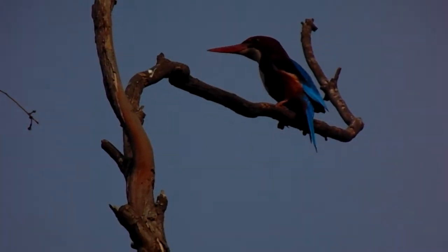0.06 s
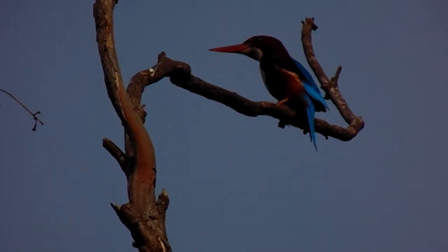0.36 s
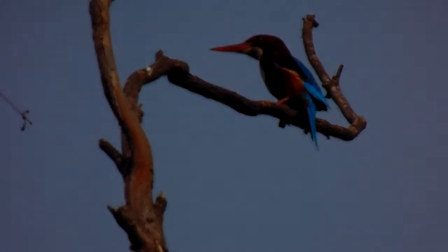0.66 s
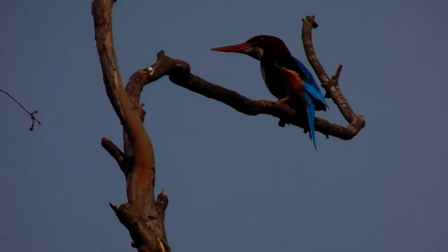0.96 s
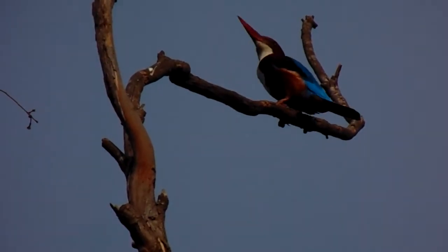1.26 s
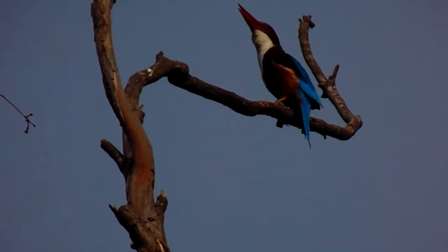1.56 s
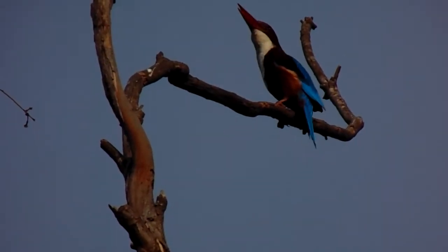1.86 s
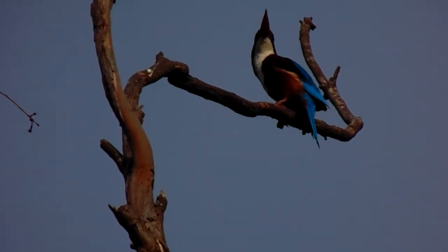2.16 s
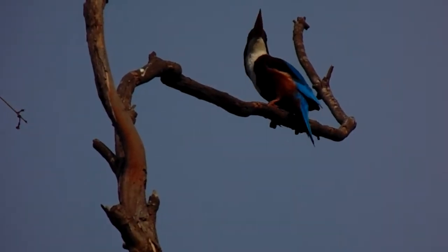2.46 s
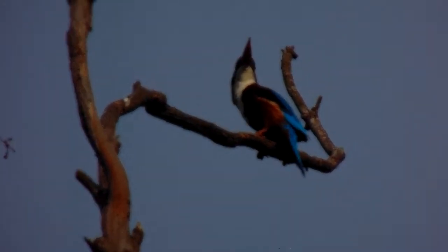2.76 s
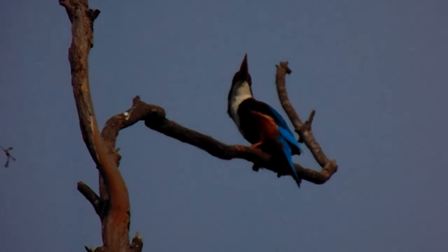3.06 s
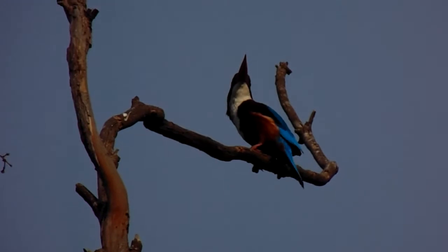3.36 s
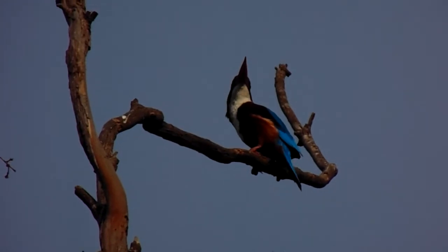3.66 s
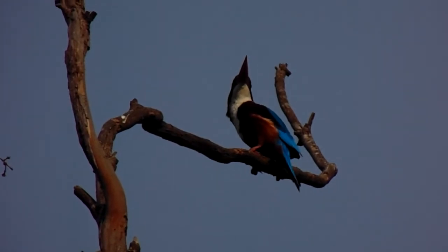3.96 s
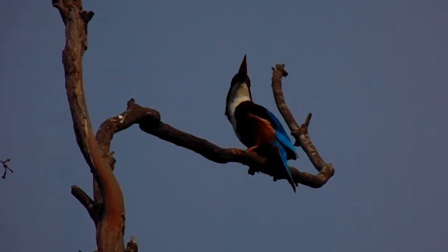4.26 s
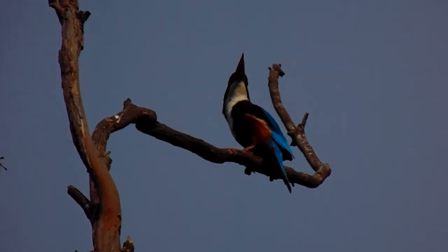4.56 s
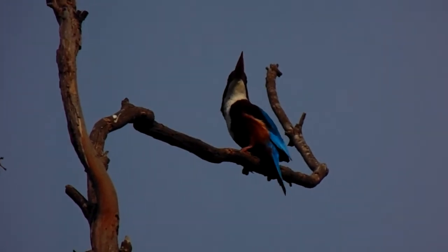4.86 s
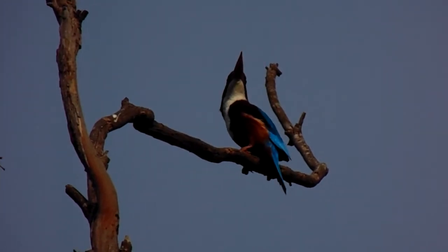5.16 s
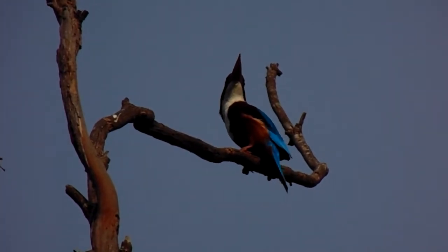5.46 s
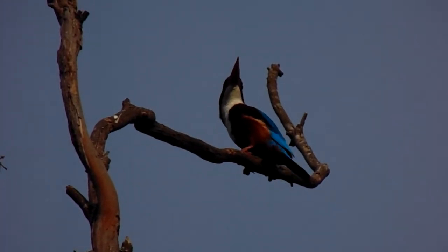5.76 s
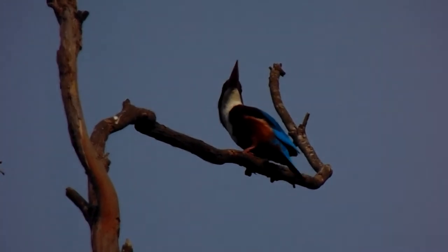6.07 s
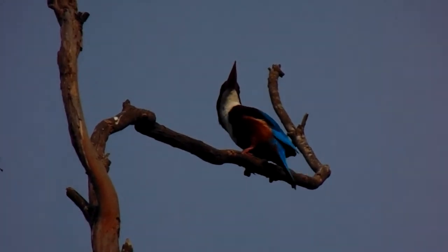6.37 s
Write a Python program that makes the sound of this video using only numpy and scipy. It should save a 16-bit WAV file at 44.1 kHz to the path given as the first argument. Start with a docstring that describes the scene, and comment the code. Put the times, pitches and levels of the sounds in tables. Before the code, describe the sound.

Faint chirps and a steady microphone hiss open an outdoor scene with a low hum of distant traffic. A kingfisher then trills high whistled double notes, three or four a second, each with a raspy edge and a short echo from the trees. Another bird overlaps it with hoarse, downward-sliding squeals, first around the start of the trill and again near the end, as a far vehicle swells slightly.

```python
"""A kingfisher on a bare branch trills a long series of double notes: in each half its syrinx flaps
in a rasp, then locks into a short arched whistle. A second bird cuts in with falling squeals,
harmonics sliding through the resonances of its beak, and small birds chirp far off.
Trees scatter every call back as reverberation. Behind them lie outdoor air, distant traffic
and the hiss of the camera."""
import sys
import numpy as np
from scipy import signal
from scipy.fft import rfft, irfft, next_fast_len
from scipy.io import wavfile
from scipy.ndimage import map_coordinates

SR = 44100
rng = np.random.default_rng(int(sys.argv[2]) if len(sys.argv) > 2 else 0)


def unload_wav(signal):
    """Save mono or channel-first audio to the path in sys.argv[1] as 16-bit WAV at rate SR, clipped to [-1, 1]."""
    wavfile.write(
        sys.argv[1],
        SR,
        np.round(np.clip(np.atleast_2d(signal).T, -1, 1) * 32767).astype(np.int16),
    )


N = 287973
TOP_HZ = 14250


def amp(db):
    """Decibels to amplitude ratio."""
    return 10 ** (np.asarray(db) / 20)


def unit(x):
    """Normalisation to rms 1."""
    return x / np.sqrt(np.mean(x ** 2) + 1e-20)


def along(points, hz):
    """Interpolation of (frequency_hz, value) points on a log frequency axis."""
    f, v = np.transpose(points)
    return np.interp(np.log(hz + 1), np.log(f + 1), v)


def curves(rows, t):
    """Linear interpolation of each column after the first, at times t."""
    s, *cols = np.transpose(rows)
    return [np.interp(t, s, c) for c in cols]


def wobble(rate, n):
    """Smooth random modulation: a spline through rate knots a second."""
    return map_coordinates(rng.standard_normal(int(n * rate / SR) + 4), [np.arange(n) * rate / SR])


def cycle(hz):
    """Phase as the integral of frequency."""
    return 2 * np.pi * np.cumsum(hz) / SR


def bend(u, start_hz, middle_hz, end_hz):
    """Parabolic glide through three pitches as u goes from 0 to 1."""
    return np.polyval(np.polyfit([0, .5, 1], [start_hz, middle_hz, end_hz], 2), u)


def swell(t, peak_s, db, rise_s, fall_s):
    """Gaussian envelope with separate rise and fall widths."""
    return amp(db) * np.exp(-((t - peak_s) / np.where(t < peak_s, rise_s, fall_s)) ** 2)


def coloured(x, spectrum):
    """Spectral shaping by (frequency_hz, gain_db) points, at rms 1."""
    m = next_fast_len(2 * len(x))
    gain = amp(along(spectrum, np.fft.rfftfreq(m, 1 / SR)))
    return unit(irfft(rfft(x, m) * gain, m)[:len(x)])


def add(track, start_s, x):
    """Superposition of x on the track."""
    i = max(round(start_s * SR), 0)
    part = track[i:i + len(x)]
    part += x[:len(part)]


# spectrum of outdoor air: frequency_hz, gain_db
AIR_SPECTRUM = [(12, -42), (20, -3), (46, -1), (69, -4.5), (101, -9), (126, -8), (207, -7.5), (319, -11.5),
                (552, -10.5), (652, -12), (752, -10.5), (2480, -11.5), (2860, -10.5), (3150, -10.5),
                (6000, -15.5), (7800, -59), (13200, -120)]
def outdoor_air():
    """Ambient noise: a broad spectrum whose level drifts slightly."""
    drift_db = .5 * wobble(3.63, N)
    return amp(-42 + drift_db) * coloured(rng.standard_normal(N), AIR_SPECTRUM)


# spectrum of the hiss: frequency_hz, gain_db
HISS_SPECTRUM = [(4000, -23.5), (6300, -10), (6900, -3.5), (7800, -1.5), (8300, 1.5), (8700, -7.5),
                 (10500, -7.5), (12000, -9.5), (14200, -7.5)]
def camera_hiss():
    """Self-noise: stationary and strongest in the treble."""
    return amp(-39.5) * coloured(rng.standard_normal(N), HISS_SPECTRUM)


# course of the road noise: time_s, level_db
ROAD_LEVEL = [(0, -52), (2, -50.5), (3.5, -50), (4.8, -44), (5.7, -43), (6.53, -50)]
# spectra of road noise and rumble: frequency_hz, gain_db
ROAD_SPECTRUM = [(70, -40), (120, -17), (170, 0.5), (300, -4), (430, -7.5), (700, -6), (1300, -8.5),
                 (2500, -29), (5000, -25.5)]
RUMBLE_SPECTRUM = [(90, -42), (135, -11), (158, -2), (185, -15), (300, -21), (600, -70), (2000, -120)]
# low swells on the road: peak_s, level_db, rise_s, fall_s
RUMBLE_SWELLS = [(2.8, -56, 0.37, .25), (4.8, -46, 0.099, 0.33)]
def road(t):
    """Amplitude-modulated noise: the road grows louder as a vehicle draws near."""
    level_db = curves(ROAD_LEVEL, t)[0] + .8 * wobble(5, N)
    roar = amp(level_db) * coloured(rng.standard_normal(N), ROAD_SPECTRUM)
    rumble_gain = sum(swell(t, *row) for row in RUMBLE_SWELLS)
    return roar + rumble_gain * coloured(rng.standard_normal(N), RUMBLE_SPECTRUM)


# a far vehicle's whine: time_s, pitch_hz, level_db
VEHICLE_WHINE = [(2.5, 389, -68), (3.2, 399.3, -54.5), (4.2, 418.2, -50), (5, 436, -54), (5.7, 432, -52.5),
                 (6.15, 409, -51), (6.53, 400, -57)]
# a far engine's swells: peak_s, pitch_hz, level_db, rise_s, fall_s
ENGINE_DRONES = [(.4, 97, -55, .7, .8), (1.89, 105, -45.5, .13, .17)]
# continuous hum: pitch_hz, level_db
HUM_TONES = [(45, -51.5), (69, -57), (205, -61.5)]
def engines(t, waver_db=2.5, waver=.015):
    """Propagation through air makes distant tones fluctuate in level and pitch."""
    whine_hz, whine_db = curves(VEHICLE_WHINE, t)
    tones = [(whine_hz, amp(whine_db))]
    tones += [(hz, swell(t, s, db, rise, fall)) for s, hz, db, rise, fall in ENGINE_DRONES]
    tones += [(hz, amp(db)) for hz, db in HUM_TONES]
    out = np.zeros(N)
    for hz, gain in tones:
        fading = amp(waver_db * wobble(12, N))
        out += gain * fading * np.sin(cycle(hz * (1 + waver * wobble(25, N))))
    return out


# reverberation time among the trees: frequency_hz, t60_s
TREE_DECAY = [(1000, .3), (2700, .28), (4000, .32), (6000, .27), (13000, .2)]
def among_trees(call, wet_db, build_s=0.013):
    """Scattering: a call's diffuse echo builds up as more distant trunks and leaves answer."""
    hz, t, noise = signal.stft(rng.standard_normal(SR // 2), SR, nperseg=256)
    decay = amp(-60 * t / along(TREE_DECAY, hz)[:, None])
    tail = signal.istft(noise * decay, SR, nperseg=256)[1]
    tail *= 1 - np.exp(-(np.arange(len(tail)) / SR / build_s) ** 2)
    return signal.fftconvolve(call, np.r_[1, amp(wet_db) * tail / np.linalg.norm(tail)])


# small birds' chirps: start_s, length_s, start_hz, middle_hz, end_hz, level_db
FAR_CHIRPS = [(0.07, 0.11, 10450, 10480, 10500, -44.5), (.17, 0.098, 7500, 7450, 7560, -40),
              (0.768, .096, 10800, 10800, 10650, -44), (.81, 0.048, 3010, 2580, 2400, -42),
              (1.863, 0.074, 3700, 3850, 3660, -42.5), (2.78, 0.069, 3400, 3250, 2930, -32),
              (3.025, .075, 3400, 3700, 3600, -41), (3.31, .08, 3750, 3630, 3280, -40),
              (3.578, 0.1, 3800, 3550, 3100, -37.5), (3.61, 0.15, 2500, 2360, 2410, -38.5),
              (3.838, 0.083, 3400, 3170, 2820, -39)]
def far_birds(waver=0.01):
    """Frequency-modulated pure tones: thin curved whistles from deeper in the trees."""
    out = np.zeros(N)
    for start_s, length_s, *pitches_hz, db in FAR_CHIRPS:
        u = np.linspace(0, 1, int(length_s * SR))
        hz = bend(u, *pitches_hz) * (1 + waver * wobble(377, len(u)))
        chirp = amp(db) * np.sin(np.pi * u) * np.sin(cycle(hz))
        add(out, start_s, among_trees(chirp, wet_db=-5.5))
    return out


# resonances of the second bird's throat and beak: frequency_hz, gain_db
BEAK_RESPONSE = [(1500, -34), (2100, -14.5), (2700, -7), (3500, 1.5), (4100, 0.5), (4400, -3), (4750, 1.5),
                 (5300, -6), (6100, -9), (7500, -14), (8400, -8.5), (9300, -2), (10000, -11.5),
                 (14000, -19)]
def squeal(hz, db, tilt_db_per_octave, jitter, shimmer_db=3.5):
    """Source and filter: the second bird's rough harmonics slide through stationary resonances."""
    phase = cycle(hz * (1 + jitter * wobble(1210, len(hz))))
    voice = np.zeros(len(hz))
    for k in range(1, 6):
        gain = amp(along(BEAK_RESPONSE, k * hz) + tilt_db_per_octave * np.log2(k))
        voice += (k * hz < SR / 2) * gain * np.sin(k * phase)
    voice *= amp(db + shimmer_db * wobble(251.5, len(hz)))
    return among_trees(voice, wet_db=-4, build_s=0.0029)


# the yelp that opens a squeal:
# accent_s, lead_s, fall_s, accent_hz, middle_hz, end_hz, level_db, fade_db, bright_db_per_octave
HIGH_YELPS = [(1.365, 0.015, 0.034, 2940, 2750, 2615, -18, -3.5, 0),
              (1.625, .02, 0.022, 3250, 2780, 2680, -27, 4, -4),
              (2.273, 0.019, 0.019, 3590, 3256, 3400, -18.5, -0.5, 5),
              (2.487, 0.0078, 0.021, 3220, 3094, 2900, -23.5, -1, 1),
              (5.165, 0.033, 0.014, 3750, 3480, 3200, -21, -11, 0),
              (5.443, 0.028, 0.0099, 3787, 3560, 3130, -20.5, -8, 0),
              (5.743, .037, 0.011, 3720, 3390, 3000, -22, -11, -3.5),
              (6.026, .027, 0.012, 3690, 3274, 2960, -21, -10, -3),
              (6.304, 0.02, 0.0089, 3745, 3406, 3100, -20.5, -0.5, 0)]
def yelps(tilt_db_per_octave=-6.5, flick_s=0.01206, lead_db=-8.5, jump_s=0.0045):
    """High register: a hoarse upward flick, a softer lead-in, then a clean accent that glides down."""
    out = np.zeros(N)
    for accent_s, lead_s, fall_s, *pitches_hz, db, fade_db, bright in HIGH_YELPS:
        t = np.arange(-lead_s, fall_s, 1 / SR)
        u = np.clip(t / fall_s, 0, 1)
        flick = np.interp(t + lead_s, [0, flick_s], [.86, 1])
        overshoot = np.interp(t, [-lead_s, 0], [1.07, 1])
        hz = flick * overshoot * bend(u, *pitches_hz)
        level_db = db + fade_db * u + np.interp(t, [-jump_s, 0], [lead_db, 0])
        jitter = .009 + .11 * np.exp(-((t + lead_s) / .009) ** 2)  # the hoarse onset soon settles
        add(out, accent_s - lead_s, squeal(hz, level_db, tilt_db_per_octave + bright, jitter))
    return out


# the wail a yelp breaks into:
# start_s, length_s, start_hz, settled_hz, plunge_octaves, level_db, bright_db_per_octave
LOW_WAILS = [(1.399, 0.063, 2040, 1975, 0.17, -23, -3.5), (1.648, 0.074, 2176, 1826, 0.11, -23, -6),
             (2.509, .058, 2150, 2150, 0.125, -28.5, 0.5), (5.181, 0.091, 2540, 2020, 0.45, -22, -1.5),
             (5.452, 0.089, 2610, 2047, 0.44, -23, -0.5), (5.755, .082, 2520, 2062, .46, -24, -1),
             (6.038, 0.097, 2536, 2093, .5, -24, -1), (6.311, 0.1, 2680, 2010, .48, -22.5, -0.5)]
def wails(tilt_db_per_octave=-3, sag_share=0.33, plunge_s=.034, swell_db=4):
    """Low register, led by the second harmonic: it sags, settles and plunges, rougher when forced."""
    out = np.zeros(N)
    for start_s, length_s, start_hz, settled_hz, octaves, db, bright in LOW_WAILS:
        t = np.arange(0, length_s, 1 / SR)
        u = t / length_s
        sag_hz = (start_hz - settled_hz) * np.exp(-(u / sag_share) ** 2)
        plunge = octaves * np.interp(length_s - t, [0, plunge_s], [1, 0]) ** 2
        hz = (settled_hz + sag_hz) * 2 ** -plunge
        # overtones come in with the attack and leave with the release
        attack_tilt = np.interp(t, [0, 0.017], [-6, 0])
        release_tilt = np.interp(length_s - t, [0, 0.02], [-11, 0])
        tilt = tilt_db_per_octave + bright + attack_tilt + release_tilt
        add(out, start_s, squeal(hz, db + swell_db * (u - .5), tilt, jitter=.026 * amp(bright)))
    return out


def screech(onset_s=2.299, centre_hz=4100, spread=0.2, attack_s=0.0074, hold_s=0.043, release_s=0.01):
    """Fast random frequency modulation spreads a tone into a band: one yelp's harsh ending."""
    out = np.zeros(N)
    t = np.arange(-attack_s, hold_s + release_s, 1 / SR)
    phase = cycle(centre_hz * np.exp(spread * wobble(1800, len(t))))
    voice = np.sin(phase) + amp(-15) * np.sin(2 * phase)
    gain = np.interp(t, [-attack_s, 0, hold_s, hold_s + release_s], [0, amp(-23), amp(-26), 0])
    add(out, onset_s - attack_s, among_trees(voice * gain, wet_db=-6.5))
    return out


# echoes from trunk, branches and ground: delay_s, gain_ratio
PERCH_ECHOES = [(.00324, .16), (.00358, .18), (.00461, .15), (.00771, .18), (.00816, .27)]
def around_perch(call):
    """Comb filtering: early reflections interfere with the direct sound, colouring all notes alike."""
    return call + sum(gain * np.pad(call, (round(delay_s * SR), 0))[:N] for delay_s, gain in PERCH_ECHOES)


# treble as the kingfisher's head turns: time_s, gain_db
HEAD_TURNS = [(1.7, 5.5), (2.5, 0), (3.25, 1.5), (3.8, -3), (4.9, -1), (6.5, -1.5)]
def bill_beam(call, t, treble_hz=4500):
    """Directivity: treble beams from the bill and fades as the head turns away."""
    treble = signal.sosfiltfilt(signal.butter(2, treble_hz, "high", fs=SR, output="sos"), call)
    return call + (amp(curves(HEAD_TURNS, t)[0]) - 1) * treble


# the rasp's envelope, timed from the whistle's middle: time_s, level_db
RASP_ENVELOPE = [(-.036, -21.5), (-.025, -6), (-.016, 1), (-.01, -4), (.002, -6), (.016, -5)]
# resonances of the kingfisher's throat: frequency_hz, gain_db
THROAT_RESPONSE = [(1200, -22.5), (1900, -17), (2350, -2), (2700, 1.5), (3050, -5.5), (3400, -11),
                   (5500, -21), (7000, -14.5), (8300, -20.5), (9400, -16), (10700, -26), (13500, -18.5)]
def rasp(t, flap_hz=270, scatter=.35):
    """Aperiodic vibration: the syrinx flaps in uneven pulses, filtered with its breath by the throat."""
    rate_hz = flap_hz * np.exp(scatter * wobble(300, len(t)))
    flap_count = np.floor(np.cumsum(rate_hz) / SR + rng.random())
    flaps = np.diff(flap_count, prepend=flap_count[0])
    sweep = np.sin(cycle(np.linspace(1000, TOP_HZ, SR // 200)))  # each flap is a 5 ms upward sweep
    pulses = unit(np.convolve(flaps, sweep)[:len(t)])
    breath = rng.standard_normal(len(t))
    return amp(curves(RASP_ENVELOPE, t)[0]) * coloured(pulses + breath, THROAT_RESPONSE)


# one whistle, timed from its middle: time_s, pitch_ratio, level_db
WHISTLE_ARCH = [(-.016, .7, -30), (-.0102, .84, -17), (-.0088, .9, -5), (-.007, .975, -1),
                (-.002, 1.018, -.3), (.004, .992, .7), (.0075, .93, .7), (.0105, .875, -7),
                (.015, .82, -26)]
# resonances of throat and open bill: frequency_hz, gain_db
BILL_RESPONSE = [(2900, -1.5), (4000, -46), (5200, -26.5), (5650, -19), (6200, -25.5), (7800, -31),
                 (8450, -14.5), (9000, -26), (10600, -30), (11250, -23.5), (12000, -35), (13700, -24)]
def whistle(t, hz, jitter=0.0053):
    """Periodic vibration: the syrinx locks into an arched tone whose harmonics the resonances pick out."""
    ratio, level_db = curves(WHISTLE_ARCH, t)
    pitch_hz = hz * ratio
    phase = cycle(pitch_hz * (1 + jitter * wobble(661, len(t))))
    harmonics = sum(amp(along(BILL_RESPONSE, k * pitch_hz)) * np.sin(k * phase) for k in range(1, 6))
    return amp(level_db) * harmonics


# the kingfisher's double notes: first_whistle_s, gap_s, pitch_hz, level_db
DOUBLE_NOTES = [(1.744, 0.049, 2806, -21.5), (1.979, 0.048, 2770, -21), (2.211, 0.054, 2828, -20),
                (2.465, .056, 2805, -19), (2.718, 0.053, 2785, -18.5), (2.972, .052, 2820, -19.5),
                (3.253, 0.054, 2808, -19), (3.505, .053, 2808, -19.5), (3.774, 0.056, 2785, -20),
                (4.054, 0.057, 2792, -20.5), (4.333, .057, 2787, -20.5), (4.642, 0.055, 2790, -19.5),
                (4.928, .055, 2800, -20), (5.255, 0.055, 2738, -21), (5.563, 0.051, 2736, -20),
                (5.857, 0.055, 2749, -19.5), (6.145, 0.056, 2768, -20.5), (6.45, 0.06, 2777, -20)]
def kingfisher(second_ratio=0.98, second_db=-0.07):
    """Two regimes of vibration: each note goes from rasp to whistle twice, lower the second time."""
    out = np.zeros(N)
    t = np.arange(-.04, .022, 1 / SR)
    for s, gap_s, hz, db in DOUBLE_NOTES:
        first = whistle(t, hz) + amp(-9) * rasp(t)
        add(out, s + t[0], amp(db) * among_trees(first, wet_db=-7))
        second = whistle(t, hz * second_ratio) + amp(-10) * rasp(t)
        add(out, s + gap_s + t[0], amp(db + second_db) * among_trees(second, wet_db=-7.5))
    return out


def scene():
    """Superposition of the birds and their background in one channel."""
    t = np.arange(N) / SR
    trill = amp(2.5) * around_perch(bill_beam(kingfisher(), t))
    other_birds = yelps() + wails() + screech() + far_birds()
    background = outdoor_air() + camera_hiss() + road(t) + engines(t)
    return (trill + other_birds + background)[None]


def record(dry):
    """Band limiting: the camera passes nothing above TOP_HZ."""
    m = next_fast_len(N + SR // 2)
    passband = np.fft.rfftfreq(m, 1 / SR) < TOP_HZ
    return irfft(rfft(dry, m) * passband, m)[..., :N]


dry = scene()
out = record(dry)
unload_wav(out)
```